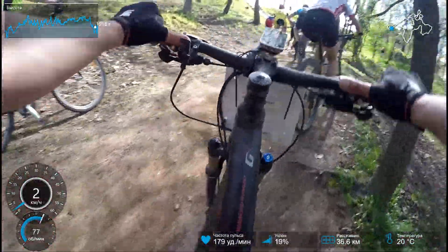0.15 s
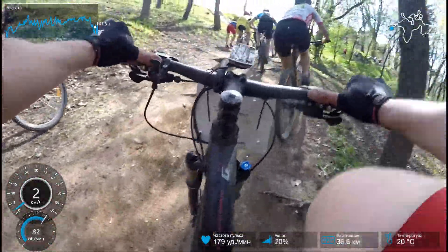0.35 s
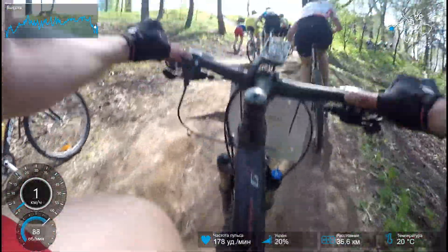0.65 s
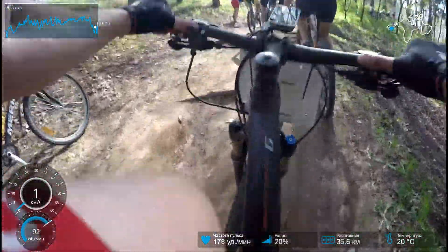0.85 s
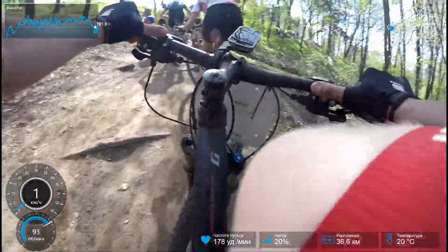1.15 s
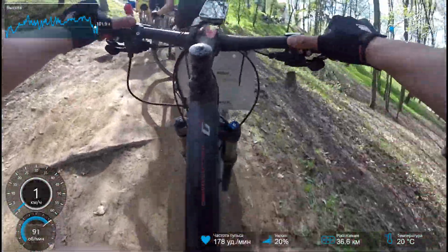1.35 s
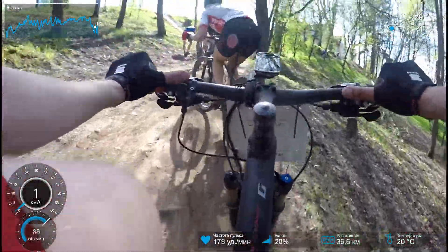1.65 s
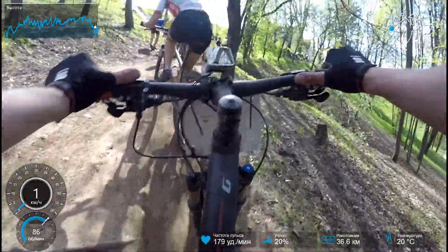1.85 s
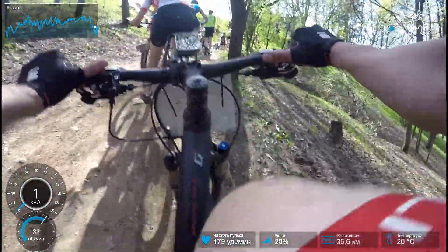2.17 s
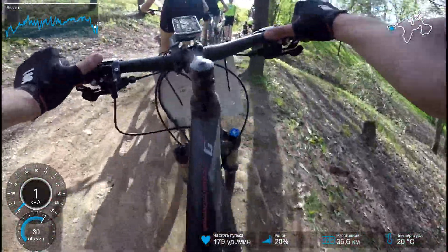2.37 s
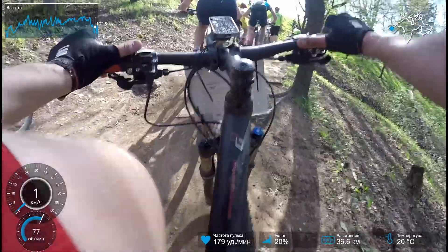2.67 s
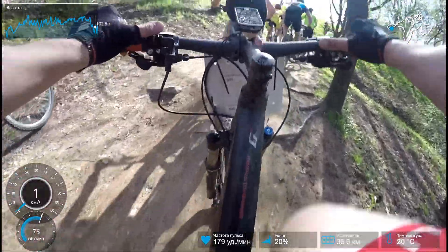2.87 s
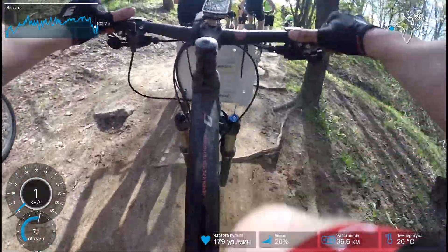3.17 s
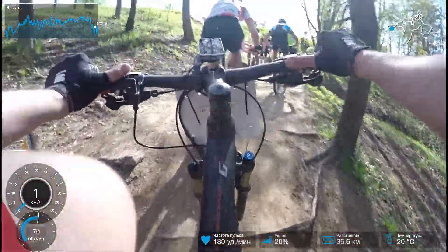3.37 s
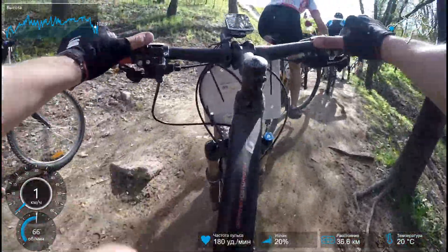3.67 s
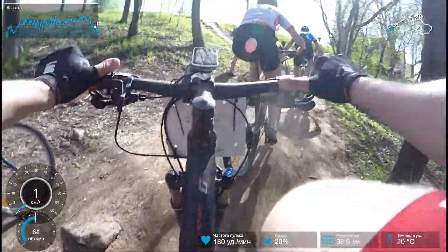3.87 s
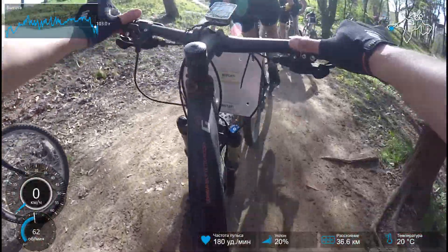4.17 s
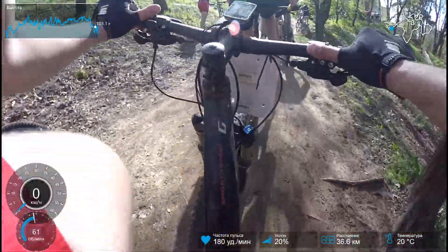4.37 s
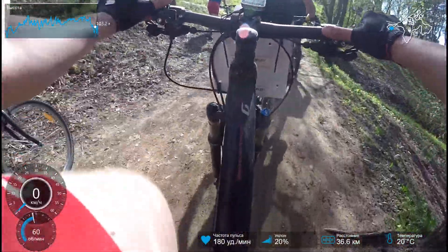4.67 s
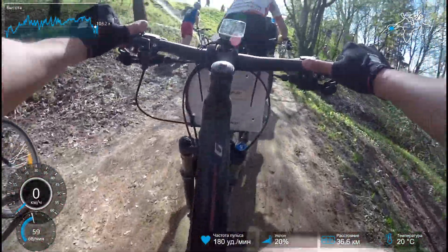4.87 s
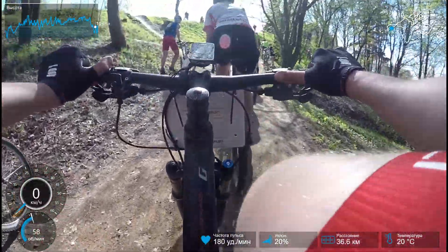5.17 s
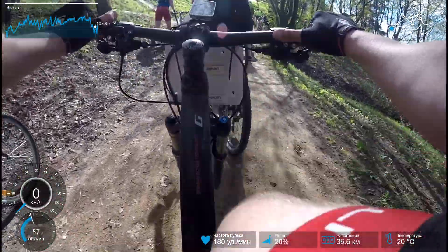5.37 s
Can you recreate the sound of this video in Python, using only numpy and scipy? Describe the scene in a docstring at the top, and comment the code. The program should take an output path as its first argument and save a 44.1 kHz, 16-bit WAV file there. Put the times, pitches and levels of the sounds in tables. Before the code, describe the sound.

A chest-worn camera in a plastic case hears a mountain bike crawling up a dirt trail. From the first instant to the end, about 5.5 seconds, deep damped heartbeats thump steadily three times a second, very slightly quickening, over low harness rumble and faint hiss. Tyres crunch dirt in grainy surges with tiny pebble pops, boxy and midrange. Bumps thud at 0.4, 0.5 and 0.7 seconds, then the heaviest jolt at 0.8 brings a cluster of dull knocks and a cloth rub. Smaller bumps follow at 1.05 and 1.8. Sharp rattly plastic clicks come at 1.37, 1.64, 2.18 and 2.6, with a knock at 1.66. Crunching bites hard at 1.7 to 2.2. After a stretch of rolling, a click at 3.46, a scrunch and cloth brush near 3.7, then strong clicks at 4.0, 4.34 and 4.66. The crunch thins after five seconds; the pulse continues.

```python
"""A racing heart thumps three times a second while tyres crunch over dirt in surges, with clicks and knocks.
A mountain bike climbs a rough trail, heard from a cased camera strapped to the rider's chest.
Heartbeats and bumps are damped swings; the crunch is grains, noise and pebble pings coloured by the case.
Clicks ring the plastic mount, knocks ring the case, and cloth rubs as narrow-band noise over a faint hiss."""
import sys
import numpy as np
from scipy import signal
from scipy.fft import rfft, irfft
from scipy.io import wavfile
from scipy.ndimage import uniform_filter1d, map_coordinates

SR = 44100
rng = np.random.default_rng(int(sys.argv[2]) if len(sys.argv) > 2 else 0)


def master(y):
    """Save y as 16-bit WAV."""
    cut = np.clip(np.atleast_2d(y).T, -1, 1)
    pcm = np.round(cut * 32767)  # scale
    wavfile.write(sys.argv[1], SR, pcm.astype(np.int16))


N = 243863
TIME_S = np.arange(N) / SR

# Hiss spectrum. Each row: frequency in Hz, relative level in dB per Hz.
HISS_SPECTRUM = [(200, 10), (1500, 10.5), (5000, 3), (8000, -0.5), (10000, -6.5), (12000, -3), (15000, -14)]
# Cloth rubbing the case. Each row: middle in seconds, bell length in seconds, level in dB,
# centre in Hz, width of each of two filter passes in Hz.
CLOTH_RUBS = [(0.10, 0.04, -64, 11700, 2000), (0.127, 0.14, -46, 670, 190),
              (0.841, 0.0067, -41.5, 229, 600), (0.854, 0.031, -40, 168, 256),
              (0.857, 0.013, -44, 654, 800), (0.925, 0.047, -56.5, 10500, 7000),
              (1.551, 0.015, -53, 6340, 3500), (2.028, 0.038, -64, 11700, 2000),
              (2.717, 0.028, -64, 11700, 2000), (3.317, .015, -53, 3800, 3000),
              (3.653, 0.0086, -51, 3900, 2500), (3.754, 0.062, -48.5, 684, 119)]
# Dull knocks on the case. Each row: start in seconds, peak level in dB, ring in Hz.
CASE_KNOCKS = [(0.598, -32, 1380), (0.798, -26.5, 1244), (0.813, -36, 1470), (0.829, -32.5, 410),
               (0.835, -30.5, 993), (0.838, -22.5, 169), (0.856, -30, 655), (0.862, -42, 253),
               (0.889, -34, 2400), (1.172, -33.5, 1384), (1.405, -32.5, 1470), (1.434, -31, 1313),
               (1.663, -24, 1430), (2.159, -33.5, 1334), (2.182, -29, 1400), (2.275, -32, 1917),
               (3.603, -40, 1320), (3.703, -35.5, 613), (4.045, -39, 335), (4.06, -40, 1290),
               (4.166, -45, 1350), (4.228, -38, 1390)]
# Sharp clicks of the mount. Each row: start in seconds, body and snap levels in dB rms over the attack.
MOUNT_CLICKS = [(0.433, -39.5, -38), (0.477, -42, -45), (0.7035, -44, -41.5), (1.2119, -46.5, -41.5),
                (1.368, -32, -29.5), (1.5429, -36.5, -61), (1.6398, -40, -32.5), (2.139, -39.5, -35.5),
                (2.1795, -33, -31.5), (2.275, -44.5, -70), (2.576, -36, -33.6), (3.462, -30, -29.5),
                (3.9949, -37, -36.5), (4.0452, -28.5, -30), (4.3431, -25.5, -26.5), (4.659, -24.5, -28)]
# Resonances of the plastic mount. Each row: centre in Hz, width in Hz, relative level in dB per Hz.
MOUNT_MODES = [(1830, 40, -3), (2325, 80, 2), (2700, 50, -1), (2900, 130, 0), (3080, 130, 1.5),
               (3450, 160, -10), (3850, 50, -6), (4240, 14, -1.5), (4420, 100, -16), (4700, 200, -8),
               (5120, 90, -7), (5570, 90, -9), (6400, 200, -12), (6730, 220, -8), (7560, 70, -7),
               (7780, 100, -9), (8310, 120, -4), (8560, 150, -8), (9420, 90, -11), (10330, 100, -9),
               (10640, 260, -14), (11850, 200, -15), (12300, 300, -13), (13120, 150, -14),
               (13550, 260, -10), (14220, 300, -10)]
# Air and wall resonances of the case. Each row: centre in Hz, width in Hz, relative gain in dB.
CASE_MODES = [(651, 130, -2), (862, 49, -7), (1284, 120, -2), (1380, 110, -11), (1948, 100, -18),
              (2810, 118, -4.5), (3320, 43, -27.5), (4160, 64, -27), (4710, 50, -14), (5180, 48, -5.5),
              (5400, 43, -35.5)]
# Spectrum of the harness sway. Each row: frequency in Hz, relative level in dB per Hz.
SWAY_SPECTRUM = [(12, 2.5), (24, 8.5), (42, 3.5), (60, -10.5), (100, -14), (170, -22.5), (300, -39.5),
                 (600, -63)]
# Bumps that shake the harness. Each row: start in seconds, envelope peak in dB, bounce in Hz.
TRAIL_BUMPS = [(0.389, -27.5, 88), (0.529, -18.5, 24.9), (0.719, -17, 25.4), (0.823, -11.5, 24.4),
               (0.831, -17, 63.6), (1.049, -24, 23.4), (1.829, -26, 27.5)]
# Spectrum of the dirt noise. Each row: frequency in Hz, relative level in dB per Hz.
DIRT_SPECTRUM = [(150, -33), (260, 2.5), (440, -4), (640, -6.5), (1050, 2), (1320, -4), (1730, -4.5),
                 (2320, 5), (2570, -5.5), (2900, -6.5), (4300, -3.5), (6000, -19.5), (8500, -22),
                 (10000, -93), (15000, -46)]
# Rolling of the tyres, rising and falling between the scrunches. Each row: time in seconds,
# reference level in dB.
ROLLING_LEVELS = [(0.17, -51.5), (0.28, -56), (0.48, -49), (0.64, -53.5), (0.76, -49), (1.07, -53),
                  (1.17, -49.5), (1.25, -54), (1.5, -51), (1.8, -60), (2.09, -65), (2.3, -50.5), (2.9, -55),
                  (3.4, -52), (3.93, -60), (4.15, -58), (4.4, -53.5), (4.65, -54), (4.88, -54), (4.97, -62),
                  (5.19, -73), (5.35, -58.5)]
# Scrunches, where a tyre bites into loose dirt. Each row: middle in seconds, bell length in seconds,
# reference level in dB.
TYRE_SCRUNCHES = [(0.056, 0.2, -46), (0.193, 0.088, -48.5), (0.37, 0.043, -47.5), (0.536, 0.078, -43.5),
                  (0.795, 0.15, -47.5), (0.99, 0.086, -46.5), (1.427, 0.021, -46.5), (1.708, 0.085, -43),
                  (1.897, 0.078, -42.5), (2.027, 0.046, -44.5), (2.178, 0.053, -45), (2.458, 0.1, -46.5),
                  (2.704, 0.091, -48.5), (3.614, 0.02, -44.5), (3.745, 0.084, -44), (4.05, 0.099, -51),
                  (4.185, 0.035, -47), (4.31, 0.04, -49.5), (4.491, 0.041, -45.5), (5.055, 0.094, -55),
                  (5.302, 0.099, -51.5)]
# Heartbeats in turn. Each row: heave of the chest in dB, thud of the valves in dB, thud in Hz,
# rebound in dB; levels are envelope peaks.
HEARTBEATS = [(-9, -29, 46, -38), (-15.5, -26.5, 64, -18.5), (-11.5, -25, 77, -20), (-11, -23, 69, -17.5),
              (-16, -23, 63, -20.5), (-13, -25, 64.4, -23), (-14, -22.5, 68, -32), (-11.5, -22, 67, -23),
              (-15, -20.5, 62, -24), (-17.5, -22.5, 56, -48), (-15, -24, 64.4, -21), (-11.5, -25, 70, -25),
              (-11.5, -24, 69, -27), (-14, -24, 61, -24.5), (-18, -24, 65, -21.5), (-12, -26.5, 63, -21),
              (-15.5, -24, 62, -35)]

TOP_HZ = 15200
# each beat period is shorter than the last by QUICKENING_S
FIRST_BEAT_S, BEAT_PERIOD_S, QUICKENING_S = -0.011, 0.33351, 0.000207
# the harness sways less as the bike slows
SWAY_DB, SWAY_DB_PER_S = -31, -1.4
CLICK_ATTACK_S = 0.005
# pebble level is relative to the tyre reference level
PEBBLE_LO_HZ, PEBBLE_HI_HZ, PEBBLE_T60_S, PEBBLE_DB = 579, 4800, 0.03, -5


def undb(db):
    """Decibels to gain."""
    return 10 ** (np.asarray(db) / 20)


def unit(x):
    """Scale to rms 1."""
    return x / np.sqrt(np.mean(x ** 2))


def fade(t_s, t60_s):
    """Exponential decay, 60 dB down after t60_s."""
    return np.exp(-np.log(1000) * t_s / t60_s)


def swell(middle_s, length_s):
    """Bell-shaped rise and fall, peak 1."""
    return np.exp(-2 * ((TIME_S - middle_s) / length_s) ** 2)


def walk(rate_hz):
    """Smooth random wander, rms near 1."""
    hold = int(SR / rate_hz)
    steps = np.repeat(rng.standard_normal(N // hold + 1), hold)
    smooth = uniform_filter1d(uniform_filter1d(steps, hold), hold)
    return unit(smooth[:N])


def add(track, start_s, sound):
    """Mix a sound in at start_s, trimmed to the track."""
    start = int(start_s * SR)
    part = sound[max(-start, 0):max(N - start, 0)]
    first = max(start, 0)
    track[first:first + len(part)] += part


def resonate(x, hz, width_hz):
    """Two-pole resonance, gain 1 at its centre."""
    b, a = signal.iirpeak(min(hz, 0.45 * SR), hz / width_hz, fs=SR)
    return signal.lfilter(b, a, x)


def band(x, lo_hz, hi_hz, order=2):
    """Butterworth band-pass."""
    sos = signal.butter(order, [lo_hz, min(hi_hz, 0.45 * SR)], "band", fs=SR, output="sos")
    return signal.sosfilt(sos, x)


def colour(x, spectrum):
    """Filter by a spectrum interpolated over log frequency; rms 1."""
    hz, db = np.transpose(spectrum)
    bins_hz = np.maximum(np.arange(len(x) // 2 + 1) * SR / len(x), 1)
    gain = undb(np.interp(np.log(bins_hz), np.log(hz), db))
    return unit(irfft(rfft(x) * gain, len(x)))


def thump(hz, rise_s, softness):
    """A heavily damped swing: its envelope peaks at rise_s and dies within a few cycles."""
    t_s = TIME_S[:SR // 4]
    envelope = (t_s / rise_s * np.exp(1 - t_s / rise_s)) ** softness
    return -envelope * np.sin(2 * np.pi * hz * t_s)


def ping(hz, t60_s):
    """One struck resonance: a decaying sine."""
    t_s = TIME_S[:SR // 10]
    return np.sin(2 * np.pi * hz * t_s) * fade(t_s, t60_s)


def through_case(x, direct_db=-13):
    """Sound reaches the microphone through the case and rings its resonances."""
    ringing = sum(undb(db) * resonate(x, hz, width_hz) for hz, width_hz, db in CASE_MODES)
    return undb(direct_db) * x + ringing


def hiss():
    """Faint steady noise with a shaped spectrum."""
    return undb(-61.0) * colour(rng.standard_normal(N), HISS_SPECTRUM)


def cloth(rise_per_s=1.53):
    """The jersey brushes the case: bell-shaped noise bands that rise in pitch as it tightens."""
    out = np.zeros(N)
    for middle_s, length_s, db, hz, width_hz in CLOTH_RUBS:
        once = resonate(rng.standard_normal(N), hz, width_hz)
        rub = unit(resonate(once, hz, width_hz))
        # reading the noise ever faster raises its pitch
        read_s = TIME_S + rise_per_s * (TIME_S - middle_s) ** 2 / 2
        rub = map_coordinates(rub, [SR * read_s])
        out += undb(db) * swell(middle_s, length_s) * rub
    return out


def knock(hz, ring_db=-5, ring_t60_s=0.073, scuff_t60_s=0.042, spread=2.3):
    """A soft, scuffing blow rings the case around one pitch; peak 1."""
    ring = ping(hz, ring_t60_s)
    scuff = rng.standard_normal(len(ring)) * fade(TIME_S[:len(ring)], scuff_t60_s)
    push = through_case(band(scuff, hz / spread, hz * spread))
    sound = push / np.abs(push).max() + undb(ring_db) * ring
    return sound / np.abs(sound).max()


def knocks():
    """Separate knocks as the case is jolted, each with its own pitch."""
    out = np.zeros(N)
    for start_s, db, hz in CASE_KNOCKS:
        add(out, start_s, undb(db) * knock(hz))
    return out


def struck(x, db):
    """Scale a click so that its attack has the given level."""
    attack = x[:int(CLICK_ATTACK_S * SR)]
    return undb(db) * x / np.std(attack)


def clicks(tail_db=-15, split_hz=5000, case_db=-9, case_hz=1400, scatter_db=0.5):
    """The mount lets go in tiny slips that ring its plastic and jolt the case; a faint buzz follows."""
    out, t_s = np.zeros(N), TIME_S[:SR // 6]
    slip_s, crack_t60_s, tail_t60_s = 0.0011, 0.013, 0.075
    crack = fade(np.maximum(t_s - slip_s, 0), crack_t60_s)
    force = crack + undb(tail_db) * fade(t_s, tail_t60_s)
    for start_s, body_db, snap_db in MOUNT_CLICKS:
        sound = 0
        for hz, width_hz, db in MOUNT_MODES:
            ring = unit(resonate(force * rng.standard_normal(len(t_s)), hz, width_hz))
            mode_gain = undb(db + scatter_db * rng.standard_normal()) * np.sqrt(width_hz)
            sound = sound + mode_gain * ring
        # body and snap have separate levels for each click
        body = struck(band(sound, 1820, split_hz, order=3), body_db)
        snap = struck(band(sound, split_hz, 14100, order=3), snap_db)
        add(out, start_s, body + snap)
        add(out, start_s, undb(body_db + case_db) * knock(case_hz))
    return out


def harness(rise_cycles=0.8):
    """The strapped camera sways all the time, as low noise, and bounces at each bump."""
    sway_db = SWAY_DB + SWAY_DB_PER_S * TIME_S
    out = colour(rng.standard_normal(N), SWAY_SPECTRUM) * undb(sway_db)
    for start_s, db, hz in TRAIL_BUMPS:
        add(out, start_s, undb(db) * thump(hz, rise_s=rise_cycles / hz, softness=2.56))
    return out


def tyre_level():
    """Reference level of the dirt noise in dB: rolling and scrunches summed as power."""
    power = undb(np.interp(TIME_S, *np.transpose(ROLLING_LEVELS))) ** 2
    for middle_s, length_s, db in TYRE_SCRUNCHES:
        power = power + (undb(db) * swell(middle_s, length_s)) ** 2
    return 10 * np.log10(power)


def pebbles(count=1500, range_db=11):
    """Small stones pop under the knobs at random pitch and size, louder where the tyre bites."""
    out = np.zeros(N)
    for when, pitch, size in rng.random((count, 3)):
        hz = PEBBLE_LO_HZ * (PEBBLE_HI_HZ / PEBBLE_LO_HZ) ** pitch
        add(out, when * TIME_S[-1], undb(range_db * size) * ping(hz, PEBBLE_T60_S))
    return unit(through_case(out, direct_db=2)) * undb(tyre_level() + PEBBLE_DB)


def tyres(grains_per_s=1000, smooth_db=-3, grit_growth=0.89, coarse_db=-1, grit_db=-8.5,
          fizz_db=-24.0, uneven_db=2):
    """Crumbs of dirt break under the knobs; grains and noise reach the microphone through the case."""
    crunch_db = tyre_level() + uneven_db * walk(45)
    sizes = undb(3 * np.minimum(rng.exponential(size=N), 4))
    grains = (rng.random(N) < grains_per_s / SR) * sizes * rng.choice([-1, 1], N)
    rough = unit(grains) + undb(smooth_db) * rng.standard_normal(N)
    cased = through_case(colour(rough, DIRT_SPECTRUM))
    coarse = unit(band(cased, 270, 1880, order=3))
    coarse = coarse * undb(crunch_db + coarse_db + 1.66 * walk(60))
    # fine grit swells less than the coarse crunch
    grit = unit(band(cased, 1810, TOP_HZ, order=3)) * undb(grit_growth * crunch_db + grit_db)
    # thin dusty fizz follows the surges
    fizz = unit(band(rng.standard_normal(N), 10150, 12200))
    fizz = fizz * undb(crunch_db + fizz_db + 2 * walk(13))
    return coarse + grit + fizz


def heart(chest_hz=28, rebound_hz=54, rebound_s=0.02234):
    """Each beat heaves the chest wall; closing valves add a higher thud and a rebound of uneven timing."""
    out = np.zeros(N)
    for beat, (heave_db, thud_db, thud_hz, rebound_db) in enumerate(HEARTBEATS):
        start_s = FIRST_BEAT_S + beat * BEAT_PERIOD_S - QUICKENING_S * beat ** 2 / 2
        heave = thump(chest_hz, rise_s=0.021, softness=1.39)
        thud = thump(thud_hz, rise_s=0.0075, softness=0.45)
        rebound = thump(rebound_hz, rise_s=0.0064, softness=0.93)
        late_s = rebound_s + 0.0017 * rng.standard_normal()
        add(out, start_s, undb(heave_db) * heave)
        add(out, start_s + 0.0042, undb(thud_db) * thud)
        add(out, start_s + late_s, undb(rebound_db) * rebound)
    return out


def scene():
    """Body, bike and case over a faint steady hiss."""
    background = hiss() + cloth()
    case = knocks() + clicks() + harness()
    trail = pebbles() + tyres()
    return (background + case + trail + heart())[None]


def record(dry):
    """The sound opens with a 3 ms fade, and the camera cuts the top of the treble."""
    opening = np.minimum(TIME_S / 0.003, 1)
    treble_cut = signal.ellip(8, 0.2, 70, TOP_HZ, fs=SR, output="sos")
    return signal.sosfilt(treble_cut, dry * opening)


dry = scene()
out = record(dry)
master(out)
```